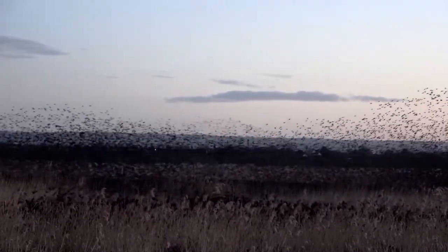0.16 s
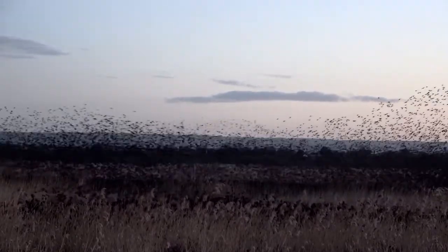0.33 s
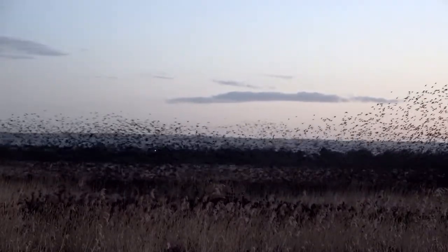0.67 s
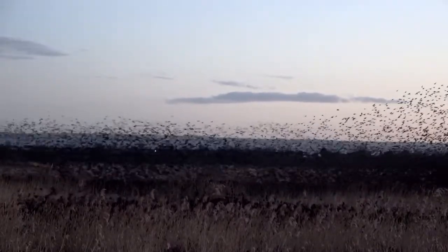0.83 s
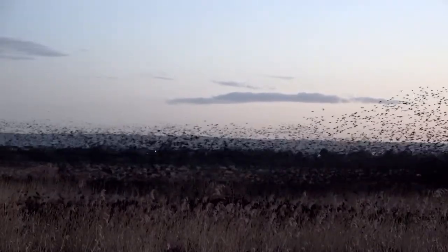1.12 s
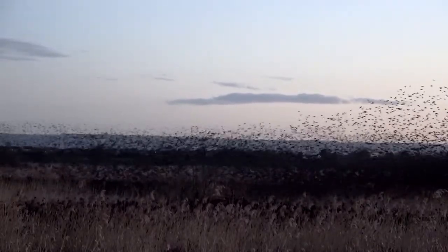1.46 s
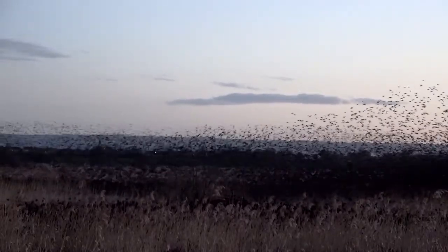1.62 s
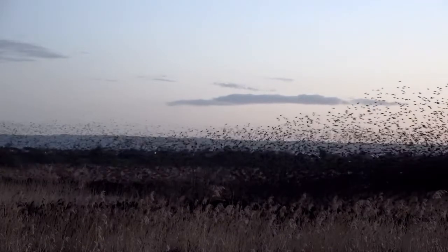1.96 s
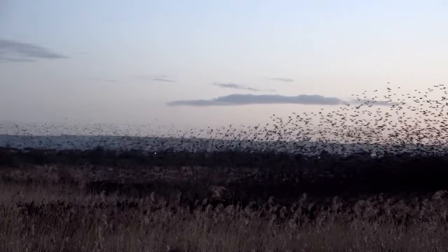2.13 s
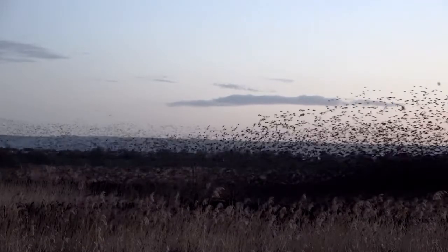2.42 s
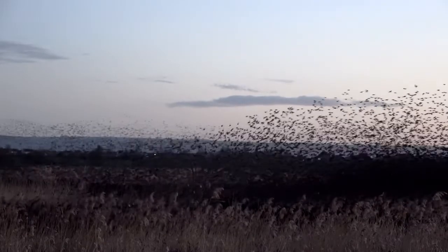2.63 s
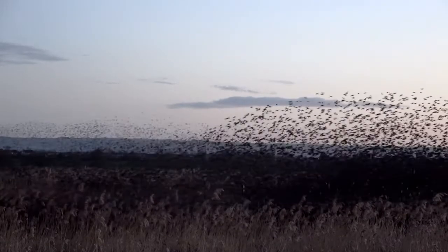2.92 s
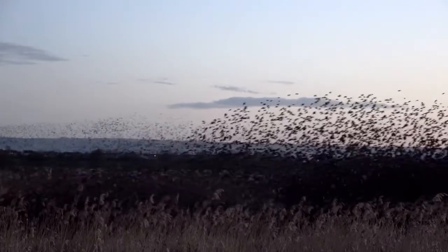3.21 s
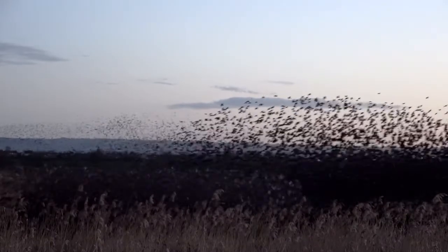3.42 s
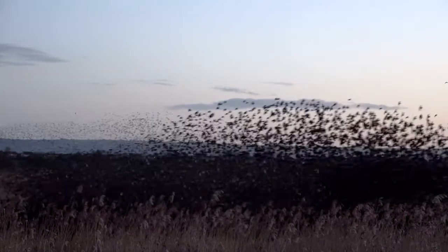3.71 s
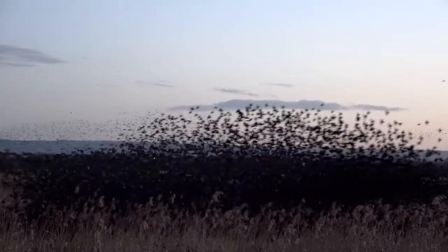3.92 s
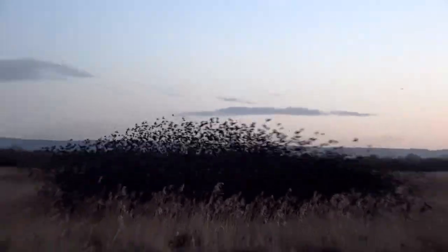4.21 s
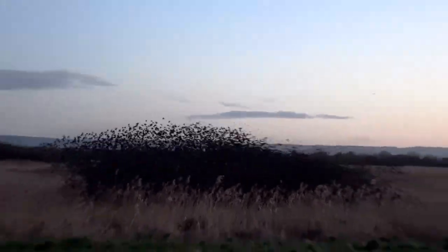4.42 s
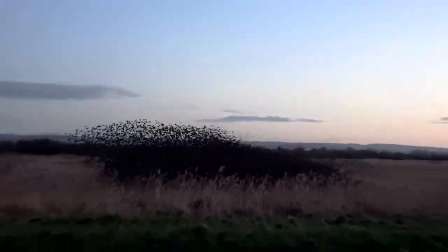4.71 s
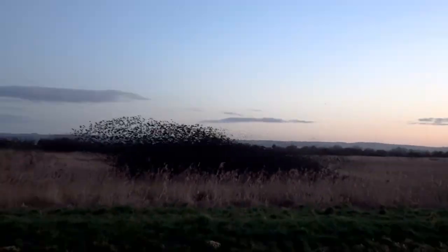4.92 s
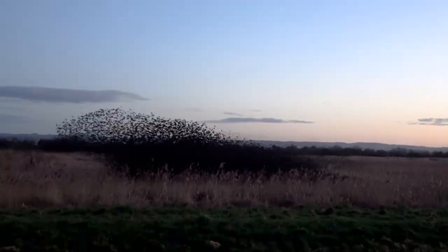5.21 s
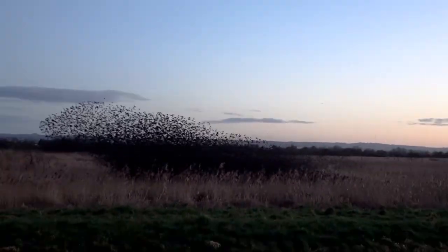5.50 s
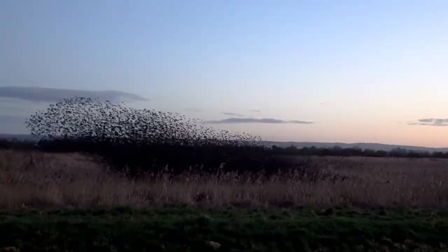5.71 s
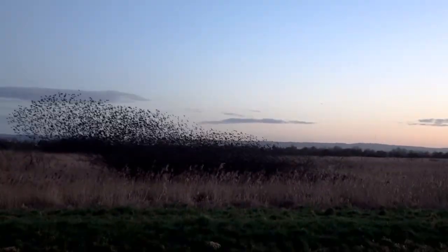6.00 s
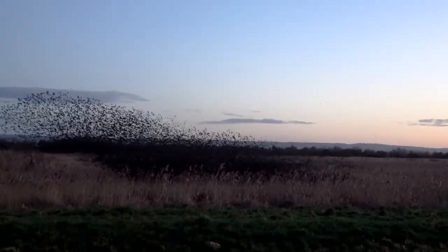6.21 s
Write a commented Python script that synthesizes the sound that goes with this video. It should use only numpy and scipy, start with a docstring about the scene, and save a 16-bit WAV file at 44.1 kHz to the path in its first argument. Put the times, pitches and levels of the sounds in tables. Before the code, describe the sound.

A huge starling flock rises from a reedbed in open country. Thousands of short buzzing calls merge into a continuous harsh chatter with a shrill, hissing top. Wing rush starts faint, swells after about two seconds and stays strong, growing fuller as the birds climb. Occasional thin whistles and raspy screeches poke out. Low wind gusts rumble at a single outdoor microphone some distance away.

```python
"""Huge starling flock lifting from a reedbed and sweeping past at a distance.
Thousands of short, buzzing, gliding tones over shaped noise merge into a chatter near 3 kHz with a shrill top.
Pulsed noise from the wingbeats swells into a rush; its spectrum shifts as the birds climb.
Shaped low noise gives gusts, the drumming of massed wings and a faint roar.
Single gliding whistles and noisy screeches stand out, with a short diffuse tail."""
import sys
import numpy as np
from scipy import signal
from scipy.fft import rfft, irfft
from scipy.io import wavfile
from scipy.ndimage import uniform_filter1d

SR = 44100
rng = np.random.default_rng(int(sys.argv[2]) if len(sys.argv) > 2 else 0)


def output_pcm(signal):
    """Save a mono or channel-first signal as 16-bit PCM at the path in sys.argv[1].

    Samples are clipped to [-1, 1] before scaling.
    """
    pcm = np.clip(np.atleast_2d(signal).T, -1, 1) * 32767
    wavfile.write(sys.argv[1], SR, np.round(pcm).astype(np.int16))


N = 280476
TIME, BINS = np.arange(N) / SR, np.fft.rfftfreq(N, 1 / SR)  # [s], [Hz]

# flock's rise and pass, in wing rush and drumming: (time [s], relative level [dB])
RUSH = [(0.0, -33), (1.4, -35.0), (2.0, -29), (2.45, -27.5), (3.0, -29), (4.2, -27), (5.1, -29.0),
        (6.36, -31)]
# climb: (time [s], share of birds high above the reeds [0-1])
ALOFT = [(0, 0.1), (2.6, 0.14), (3.5, .55), (4.4, 0.74), (6.36, 1)]
# wing rush spectrum, low birds: (frequency [Hz], relative gain [dB])
SKIMMING_COLOUR = [(100, -12), (190, -2.5), (280, 0.5), (500, -3), (750, -1.5), (1100, 2), (1550, -4),
                   (3000, -4.5), (6000, -10), (8300, -15), (10200, -26), (12300, -29), (14500, -37)]
# wing rush spectrum, high birds: (frequency [Hz], relative gain [dB])
ALOFT_COLOUR = [(100, -15), (190, -2.5), (280, 1.5), (450, 0.5), (700, 1.5), (1050, -1), (1800, -1),
                (3000, -4.5), (6000, -11), (8300, -13.5), (10200, -28.5), (12300, -29.5), (14500, -37)]

# calling thins as birds leave the reeds: (time [s], relative chatter level [dB], relative shrill level [dB])
CALLING = [(0.0, -20.5, -25.2), (1.6, -20, -25.6), (2.1, -21, -27), (4.4, -21.4, -27.8),
           (5.1, -21.5, -26.5), (6.36, -22, -26.5)]
# many birds calling at once: (centre time [s], chatter rise [dB])
FLURRIES = [(0.18, 0.6), (2.35, 1.5), (4.02, 2.0)]
FLURRY_S = 0.078  # Gaussian 1/e half-width
# chatter filter: (frequency [Hz], relative gain [dB])
CHATTER_COLOUR = [(400, -22), (1000, -16), (1500, -7.5), (2000, -1.5), (2400, -2), (2800, -1.5), (3200, -1),
                  (3500, -6), (3900, -7.5), (5000, -21.5), (8000, -55)]
# shrill-top filter: (frequency [Hz], relative gain [dB])
SHRILL_COLOUR = [(2800, -37), (4000, 0.5), (5600, 2.5), (7000, -1), (8300, -5.5), (9000, -10.5),
                 (9700, -26.5), (10300, -30.5), (12000, -28), (15500, -30)]

# gusts at the microphone: (centre time [s], level [dB])
GUSTS = [(0.47, -17), (1.96, -15.5), (2.65, -19), (3.23, -15.5), (3.6, -19), (4.03, -19), (4.25, -19.5),
         (4.53, -17), (4.95, -18.5), (5.45, -17.5)]
GUST_S, BREEZE_DB = 0.068, -24  # 1/e half-width of gust power; steady breeze, summed with gusts as power
# wind spectrum: (frequency [Hz], relative gain [dB])
AIR_COLOUR = [(8, -14), (22, -3.5), (34, -5), (45, 3.5), (62, -0.5), (80, -13), (110, -14.5), (200, -34)]
# wing drumming spectrum: (frequency [Hz], relative gain [dB])
DRUM_COLOUR = [(35, -22), (58, -5), (75, 2), (100, -4.5), (132, -10.5), (165, -18), (195, -36), (400, -52)]
# open-country roar spectrum: (frequency [Hz], relative gain [dB])
FAR_COLOUR = [(100, -3.5), (200, 0.5), (300, 1.5), (450, -14.5), (900, -16), (2000, -49)]

# nearer whistles:
# (start [s], length [s], start pitch [Hz], middle pitch [Hz], end pitch [Hz], relative level [dB])
WHISTLES = [ (.365, .07, 3650, 3900, 4500, -30), (.92, .14, 6200, 5150, 4630, -31),
            (.70, 0.17, 8400, 8800, 8500, -46), (1.042, 0.23, 9050, 8450, 7600, -42),
            (1.33, 0.33, 7600, 8300, 8600, -44), (1.46, .10, 8850, 9050, 9150, -47),
            (2.08, .20, 7950, 8430, 8400, -40), (2.85, 0.29, 7600, 8300, 8400, -37),
            (3.12, .14, 7900, 7460, 6870, -43), (3.944, 0.087, 6240, 6100, 6050, -37),
            (4.156, 0.088, 5450, 5400, 5400, -34), (4.569, 0.2, 8950, 8750, 8550, -45),
            (4.98, 0.065, 6020, 5700, 5500, -31), (5.16, 0.15, 6950, 6880, 6700, -35),
            (5.48, .08, 7850, 7800, 7750, -45)]
# nearer screeches: (start [s], length [s], centre [Hz], band width [Hz], relative level [dB])
SCREECHES = [ (0.532, .21, 7000, 2000, -34), (1.947, .10, 4600, 1000, -31), (2.96, .13, 5700, 1300, -33),
             (3.399, 0.12, 6640, 1200, -32.5), (3.871, 0.085, 5800, 1800, -30.5),
             (6.103, 0.11, 4950, 900, -31)]

EDGE_HZ = 15700


def gain_of(db):
    """Amplitude factor from dB."""
    return 10 ** (np.asarray(db) / 20)


def evened(x):
    """Scale to unit rms."""
    return x / np.sqrt(np.mean(x ** 2) + 1e-20)


def follow(curve, axis=1):
    """Gain at every sample from one dB column of a curve."""
    columns = np.transpose(curve)
    return gain_of(np.interp(TIME, columns[0], columns[axis]))


def coloured(x, points):
    """Filter on a log-frequency axis, 12 dB/octave fall above the last point, unit rms."""
    hz, db = np.transpose(points)
    gain = gain_of(np.interp(np.log(BINS + 1), np.log(hz), db))
    gain = gain / np.maximum(BINS / hz[-1], 1) ** 2
    return evened(irfft(rfft(x) * gain, N))


def wander(width_hz, count):
    """Smooth random motion: noise under a Gaussian low-pass."""
    hz = np.fft.rfftfreq(count, 1 / SR)
    spectrum = rfft(rng.standard_normal(count))
    return evened(irfft(spectrum * np.exp(-(hz / width_hz) ** 2), count))


def add(mix, start_s, sound):
    """Mix a sound in at its start time."""
    part = mix[round(start_s * SR):][:len(sound)]
    part += sound[:len(part)]


def wings(beat_hz=9.2, near_share=0.55, level_db=4.5, passing_s=1.9, count=40):
    """Each downstroke is a puff of air noise; near birds flutter over the blur of the rest."""
    flutter = np.zeros(N)
    for speed, phase, nearest, closeness in rng.random((count, 4)):
        bird_hz = beat_hz * (.8 + .4 * speed)
        stroke = np.maximum(np.sin(2 * np.pi * (bird_hz * TIME + phase)), 0) ** 4
        passing = 1 / (1 + ((TIME - nearest * TIME[-1]) / passing_s) ** 2)
        flutter += (.3 + closeness) * stroke * passing
    power = 1 - near_share + near_share * flutter / flutter.mean()
    puffs = np.sqrt(power) * rng.standard_normal(N)
    # soft ground cancels sound near 500 Hz from low birds; dip fills as they climb
    aloft = np.interp(TIME, *np.transpose(ALOFT))
    skimming_rush = (1 - aloft) * coloured(puffs, SKIMMING_COLOUR)
    aloft_rush = aloft * coloured(puffs, ALOFT_COLOUR)
    return gain_of(level_db) * follow(RUSH) * (skimming_rush + aloft_rush)


def crowd(low_hz, high_hz, length_s, glide, buzz, spread_db, count):
    """Many short gliding calls, each with a fast buzz in pitch and loudness."""
    out = np.zeros(N + SR)
    for k, (delay, pitch, length, slope, rate, closeness) in enumerate(rng.random((count, 6))):
        t = TIME[:int(length_s * (.4 + 1.2 * length) * SR)]
        u = t / t[-1]
        trill = np.sin(2 * np.pi * (60 + 160 * rate) * t)
        bend = 1 + glide * (2 * slope - 1) * (2 * u - 1) + buzz * trill
        hz = (low_hz + pitch * (high_hz - low_hz)) * bend
        tone = np.sin(2 * np.pi * np.cumsum(hz) / SR)
        call = np.sin(np.pi * u) * (1 + .5 * trill) * tone
        start_s = (k + delay) / count * (N / SR + .5)
        add(out, start_s, gain_of(spread_db * closeness ** 2) * call)
    return evened(out[SR // 4:][:N])  # start mid-chorus


def chatter(far_db=0, level_db=1):
    """Harsh chorus: separate calls over the merged voices of far birds, swelling in flurries."""
    calls = crowd(2400, 3500, length_s=.045, glide=0.1698, buzz=0.058, spread_db=6.5, count=3600)
    near = coloured(calls, CHATTER_COLOUR)
    far = gain_of(far_db) * coloured(rng.standard_normal(N), CHATTER_COLOUR)
    flurry_db = sum(db * np.exp(-((TIME - s) / FLURRY_S) ** 2) for s, db in FLURRIES)
    return gain_of(level_db + flurry_db) * follow(CALLING) * evened(near + far)


def squeals(far_db=2, thin_db=-21, level_db=-1):
    """Shrill top of the chorus: squeals in a hiss, plus a few longer thin whistles."""
    calls = crowd(3600, 9300, length_s=.08, glide=.09, buzz=0.031, spread_db=8.0, count=2200)
    near = coloured(calls, SHRILL_COLOUR)
    hiss = gain_of(far_db) * coloured(rng.standard_normal(N), SHRILL_COLOUR)
    thin = crowd(7200, 8500, length_s=0.17, glide=0.043, buzz=.01, spread_db=6, count=40)
    voices = evened(near + hiss) + gain_of(thin_db) * thin
    return gain_of(level_db) * follow(CALLING, axis=2) * voices


def turbulence(colour, steadiness=0.37):
    """Coloured noise with its slow level swings partly flattened."""
    air = coloured(rng.standard_normal(N), colour)
    power = uniform_filter1d(uniform_filter1d(air ** 2, size=3000), size=2000)
    return evened(air / np.sqrt(power) ** steadiness)


def rumble(drum_db=10, far_db=-38):
    """Breeze and gusts, low drumming of massed wings, faint roar of open country."""
    gust_power = sum(gain_of(db) ** 2 * np.exp(-((TIME - s) / GUST_S) ** 2) for s, db in GUSTS)
    wind = np.sqrt(gain_of(BREEZE_DB) ** 2 + gust_power) * turbulence(AIR_COLOUR)
    drumming = gain_of(drum_db) * follow(RUSH) * turbulence(DRUM_COLOUR)
    roar = gain_of(far_db) * coloured(rng.standard_normal(N), FAR_COLOUR)
    return wind + drumming + roar


def reedbed(x, t60_s=0.1, wet_db=-6):
    """Stems and ground scatter a short diffuse tail: convolution with decaying noise."""
    t = TIME[:SR // 3]
    tail = rng.standard_normal(len(t)) * gain_of(-60 * t / t60_s)
    return x + gain_of(wet_db) * signal.oaconvolve(x, tail / np.linalg.norm(tail))[:N]


def near_birds(waver=0.0094, trim_db=-2):
    """Single birds above the chorus: wavering whistled glides and ring-modulated noise screeches."""
    out, tremor = np.zeros(N), wander(260, count=N)
    for start_s, length_s, start_hz, middle_hz, end_hz, db in WHISTLES:
        u = np.linspace(0, 1, int(length_s * SR))
        glide = np.polyfit([0, .5, 1], [start_hz, middle_hz, end_hz], 2)
        hz = np.polyval(glide, u) * (1 + waver * tremor[int(start_s * SR):][:len(u)])
        tone = np.sin(2 * np.pi * np.cumsum(hz) / SR)
        whistle = evened(signal.windows.tukey(len(u), .5) * tone)
        add(out, start_s, gain_of(db + trim_db) * whistle)
    for start_s, length_s, centre_hz, width_hz, db in SCREECHES:
        t = TIME[:int(length_s * SR)]
        rasp = wander(width_hz / 2, count=SR)[:len(t)] * np.sin(2 * np.pi * centre_hz * t)
        screech = evened(signal.windows.tukey(len(t), .5) * rasp)
        add(out, start_s, gain_of(db + trim_db) * screech)
    return reedbed(out)


def scene():
    """Flock and air summed at one microphone."""
    return (wings() + chatter() + squeals() + rumble() + near_birds())[None]


def record(dry):
    """Linear-phase low-pass at the recorder's band limit."""
    lowpass = signal.firwin(511, EDGE_HZ, window=("kaiser", 9), fs=SR)
    return signal.oaconvolve(dry, lowpass[None], "same")


dry = scene()
out = record(dry)
output_pcm(out)
```